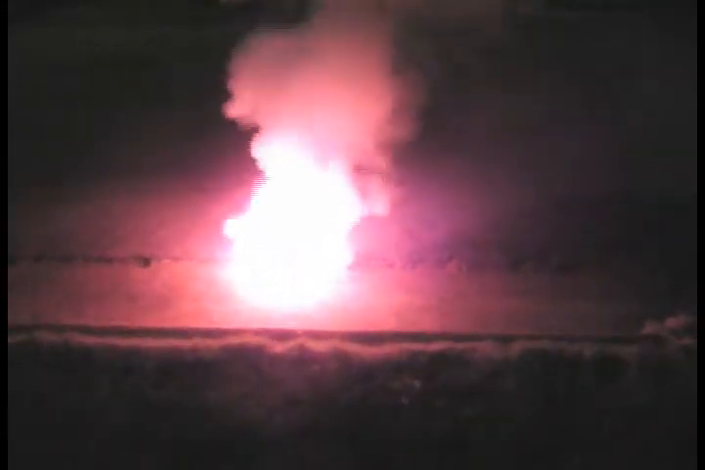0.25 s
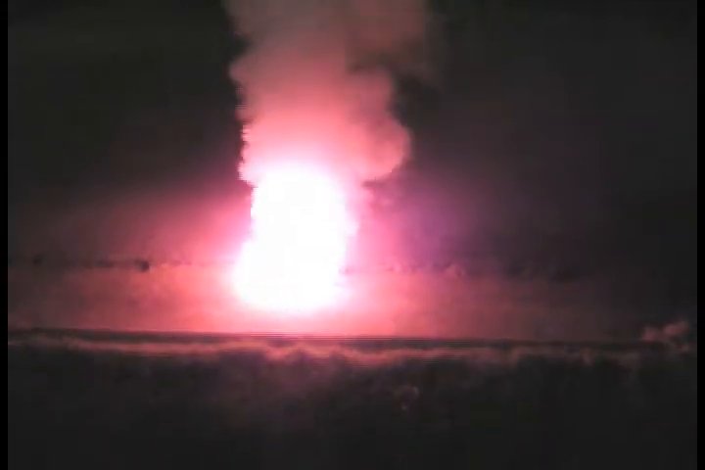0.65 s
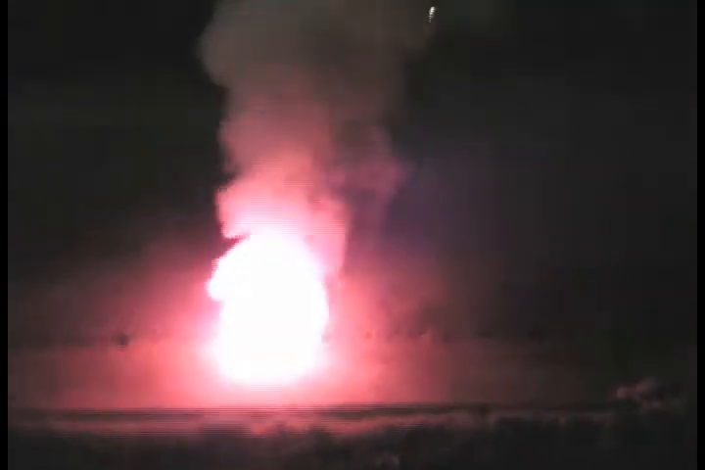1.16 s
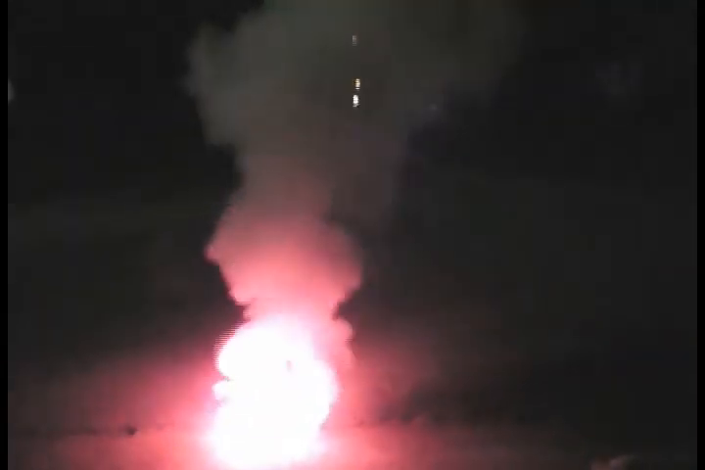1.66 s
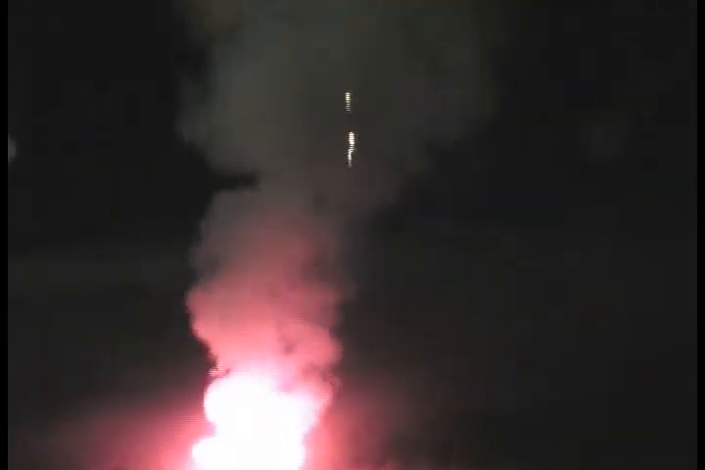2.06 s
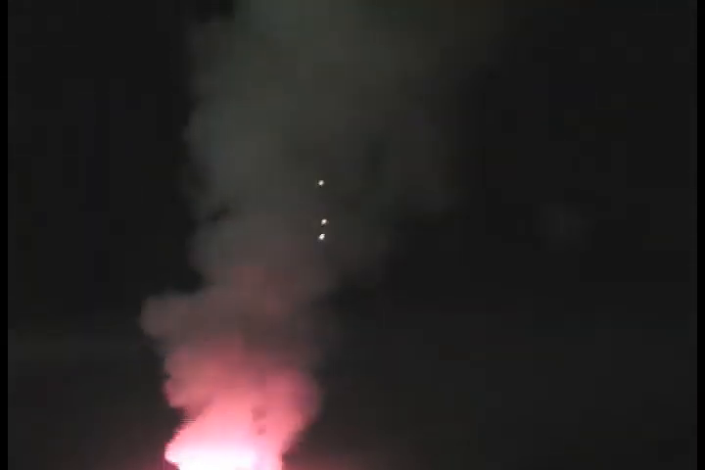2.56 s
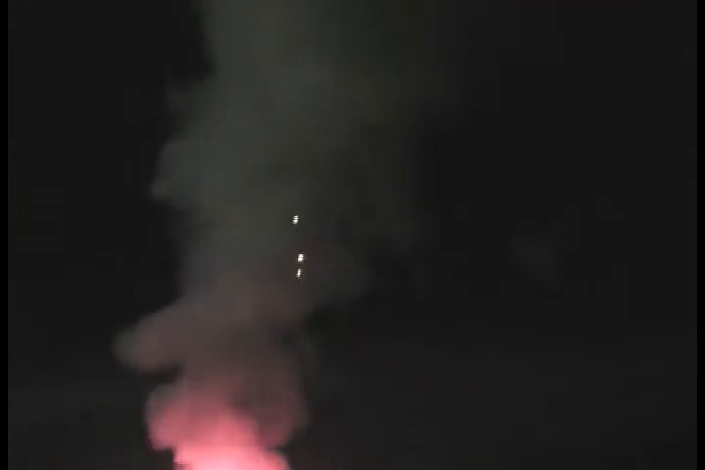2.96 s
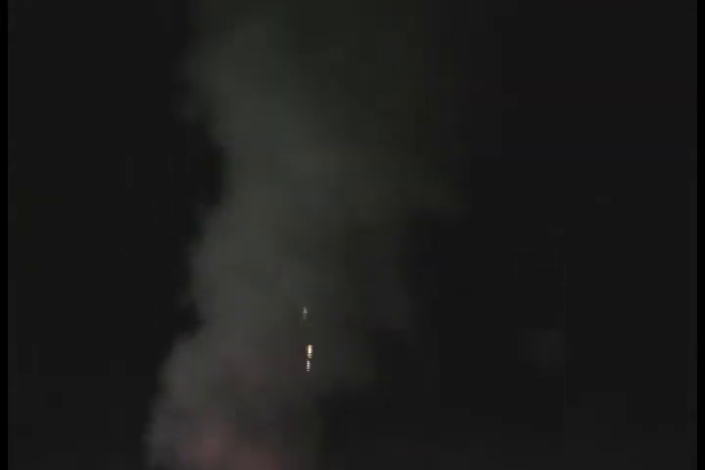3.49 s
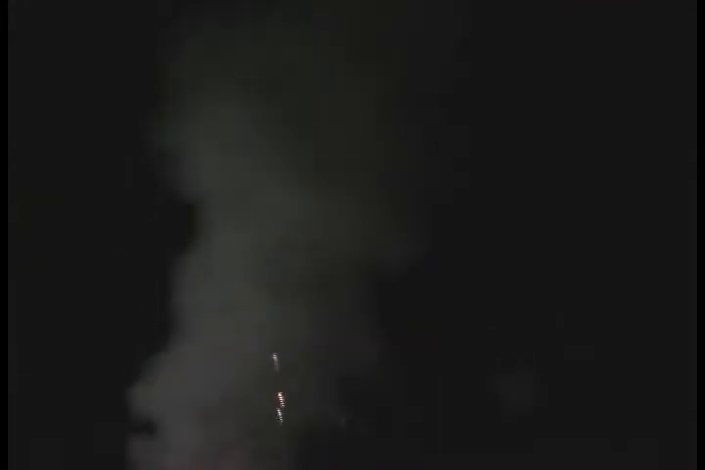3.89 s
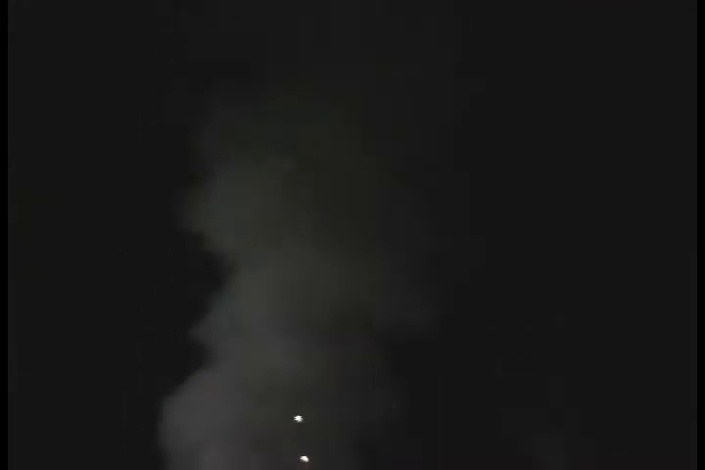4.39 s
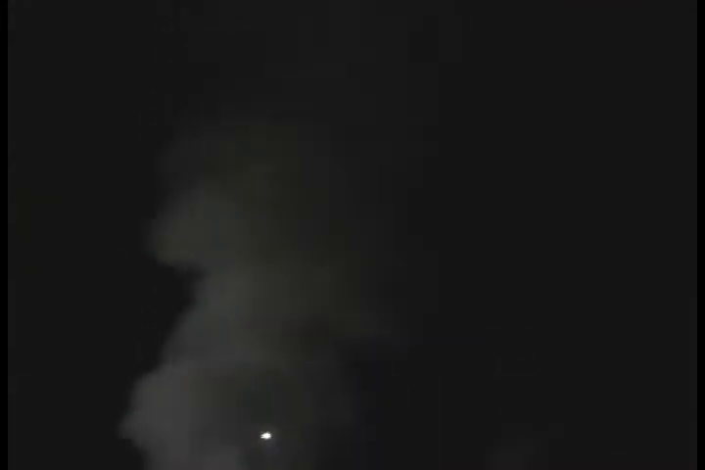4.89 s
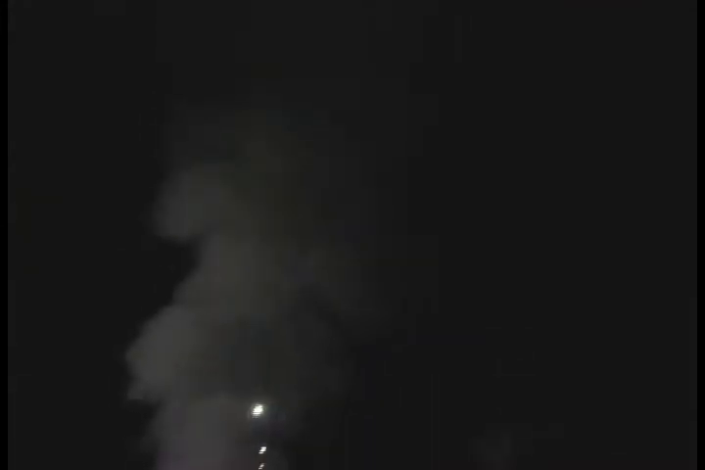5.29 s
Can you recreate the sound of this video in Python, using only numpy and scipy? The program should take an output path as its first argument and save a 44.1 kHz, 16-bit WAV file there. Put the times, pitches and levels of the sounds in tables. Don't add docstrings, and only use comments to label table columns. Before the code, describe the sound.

A burning smoke charge gives a dull, steady rushing hiss outdoors, broken by one loud sharp click, then slowly fading with a faint late hum.

```python
import sys
import numpy as np
from scipy import signal
from scipy.fft import rfft, irfft
from scipy.io import wavfile
from scipy.ndimage import uniform_filter1d

SR = 44100
rng = np.random.default_rng(int(sys.argv[2]) if len(sys.argv) > 2 else 0)


def output_pcm(signal):
    pcm = np.clip(np.atleast_2d(signal).T, -1, 1) * 32767
    wavfile.write(sys.argv[1], SR, np.round(pcm).astype(np.int16))


def linear_from_db(decibels):
    return 10 ** (np.asarray(decibels, float) / 20)


N = 244314

POP_S = .758074
MOTOR_HZ, MOTOR_START_S = 239.3, 4.58
SAG_HZ = 32

# middle in seconds, lowest pitch in Hz, length in seconds, level in dB.
CRACK_WHISTLES = [
    (2.764, 1380, 0.022, -34),
    (3.157, 1370, .024, -36),
]


def rms_one(x):
    return x / np.sqrt(np.mean(x ** 2) + 1e-20)


def track(rows, x):
    return np.interp(x, *np.transpose(rows))


def between(level, tilted, tilt):
    return level + (tilted - level) * tilt


def bell(x, centre, width):
    return np.exp(-.5 * ((x - centre) / width) ** 2)


def drift(count, t, rate):
    r = np.exp(-2 * np.pi * rate * (t[1] - t[0]))
    slow = signal.lfilter([1], [1, -2 * r, r * r], rng.standard_normal((count, len(t) + 200)))
    return rms_one(slow[:, 200:])


def wander(size):
    smooth = uniform_filter1d(rng.standard_normal(N), size=size)
    return rms_one(uniform_filter1d(smooth, size=size))


def ring(clicks, hz, t60):
    r, w = linear_from_db(-60 / (t60 * SR)), 2 * np.pi * hz / SR
    return signal.lfilter([0, np.sin(w)], [1, -2 * r * np.cos(w), r * r], clicks + 1e-18)


def jet():
    # frequency in Hz, density in dB.
    roar = [(20, -30.5), (45, -29.5), (76, -15.5), (109, -5), (232, -4), (311, -5.5), (505, -3), (1010, -7),
            (1200, -10.5), (1700, -13.5), (2400, -16), (3000, -22), (3500, -26.5), (4100, -29.5)]
    # centre in Hz, width in Hz, level in dB.
    hollows = [(220, 50, 2), (470, 120, 3), (830, 70, 2), (1160, 70, -3), (1460, 100, 3), (2370, 160, 2)]
    # time in seconds, level in dB.
    burn = [(0, -28), (.35, -27.5), (.7, -29), (1.0, -28), (1.3, -28), (1.55, -29.5), (1.8, -29.5),
            (2.3, -30), (2.8, -30.5), (3.3, -32.5), (3.7, -33), (4.1, -34.5), (4.5, -35), (5.0, -35.5),
            (5.54, -36.5)]
    # time in seconds, tilt from 0 to 1.
    turning = [(0, 0.06), (.9, 0.25), (1.5, 0.36), (2.1, 0.6), (2.6, .75), (3.1, .93), (4.4, 1.0),
               (5.54, 0.8)]
    # frequency level in Hz,
    # frequency tilted in Hz, width in Hz, depth level in dB, depth tilted in dB.
    dips = [(1650, 1665, 28, 8.5, 2), (1680, 1984, 38, -1.5, 6), (2030, 2180, 82, 0.5, 2),
            (2580, 4300, 376, 4, 7.5)]
    # centre in Hz, width in octaves, dB level, dB tilted.
    zones = [(266, 0.14, -1, -2.5), (520, 0.29, 1, -1), (55, 0.5, -1.5, 2), (110, 0.37, 0.3, 0.5),
             (1800, 0.65, 1.5, 2.5), (3830, 0.24, 3, -0.4)]
    # time in seconds, centre in Hz, length in seconds, change in dB.
    gusts = [(.03, 242, .06, -2.5), (.17, 2360, 0.093, 3.5), (.2, 95, .1, -3), (0.376, 139, .05, -8),
             (.55, 90, .06, 1), (.56, 797, 0.038, 2), (.66, 320, .07, 8.5), (.91, 620, 0.13, -3),
             (1.174, 560, .05, 5), (1.2, 95, .12, -6), (1.253, 2400, 0.11, 2.5), (1.05, 1450, .06, 0.5),
             (1.497, 520, 0.11, 3.5), (1.563, 227, 0.12, 4.5), (1.75, 480, 0.11, 3), (1.75, 100, .15, 3.5),
             (1.718, 1850, 0.11, -2.5), (1.98, 2300, 0.045, 2.5), (2.2, 950, .05, 2.5),
             (2.25, 1900, 0.12, -2), (2.345, 270, .05, -6), (2.55, 380, 0.046, 4), (2.55, 3000, .12, 2),
             (.05, 420, .08, 3.5), (1.35, 1050, .08, 0.5), (3.95, 3000, .15, 2), (2.75, 95, 0.27, -6.5),
             (2.75, 238, 0.038, 5), (2.966, 610, 0.045, 3.5), (2.98, 1800, .07, -2),
             (3.222, 560, 0.033, -3.5), (3.32, 95, .1, -5), (3.35, 2830, .05, 4), (3.55, 1450, 0.074, 2),
             (3.6, 410, 0.11, 2.5), (3.72, 230, 0.049, 3), (3.8, 90, .2, -4), (4.08, 1300, 0.092, -3),
             (4.6, 85, 0.18, 4.5), (4.6, 440, .04, 1), (5.25, 90, 0.17, 7.5), (5.33, 1800, .1, -2.5),
             (5.39, 180, .05, -4)]
    gust_octaves = .22
    clear_hz, clear_db = 32, -7
    shared_db, patchy_db = .7, .5

    hz, t, frames = signal.stft(rng.standard_normal(N), SR, nperseg=1024, noverlap=768)
    hz = np.maximum(hz, 1)[:, None]
    roar_hz, density_db = np.transpose(roar)
    shape = np.interp(np.log(hz), np.log(roar_hz), density_db, right=-120)
    for centre, width, db in hollows:
        shape = shape + db * bell(hz, centre, width)

    tilt = track(turning, t)
    tint = 0
    for centre_hz, width, level_db, tilted_db in zones:
        tint = tint + between(level_db, tilted_db, tilt) * bell(np.log2(hz / centre_hz), 0, width)
    for level_hz, tilted_hz, width_hz, level_db, tilted_db in dips:
        depth_db = between(level_db, tilted_db, tilt)
        tint = tint - depth_db * bell(hz, between(level_hz, tilted_hz, tilt), width_hz)

    octave = np.log2(hz[:, 0] / 1000)
    patch = np.clip(2 * octave + 11, 0, 15).astype(int)
    flicker = shared_db * drift(count=1, t=t, rate=45.0)
    flicker = flicker + patchy_db * drift(count=16, t=t, rate=6.4)[patch]
    for s, centre_hz, length, db in gusts:
        flicker += db * bell(np.log2(hz / centre_hz), 0, gust_octaves) * bell(t, s, length)

    flicker += clear_db * bell(hz, MOTOR_HZ, clear_hz) * (t > MOTOR_START_S)
    for s, low_hz, length, _ in CRACK_WHISTLES:
        flicker += .35 * clear_db * bell(hz, low_hz + SAG_HZ, 2 * SAG_HZ) * bell(t, s, 1.5 * length)

    even = np.sqrt(np.mean(linear_from_db(2 * shape)[7:26]) * 19 / len(hz))
    gain = linear_from_db(shape + tint + flicker + track(burn, t)) / even
    return signal.istft(frames * gain, SR, nperseg=1024, noverlap=768)[1][:N]


def puffs():
    # middle in seconds, pitch in Hz, pitch width in Hz, length in seconds, level in dB.
    leaks = [(0.809, 550, 10, .003, -22), (2.81, 1400, 45, .008, -39), (3.196, 1420, 20, .012, -39),
             (2.765, 1300, 40, .012, -40), (4.71, 112, 4, .04, -45), (4.72, 156, 4, .04, -45),
             (1.166, 549, 20, 0.006, -24), (1.217, 506, 30, 0.005, -27), (4.91, 445, 6, .05, -42),
             (5.2, 406, 4, .05, -42), (4.466, 200.6, 55, 0.03, -41), (5.098, 1002, 7.7, 0.078, -44.5)]
    t, out = np.arange(N) / SR, np.zeros(N)
    pitch_wander = wander(500)
    for s, hz, width_hz, length, db in leaks:
        phase = 2 * np.pi * np.cumsum(hz + width_hz * pitch_wander) / SR
        out += linear_from_db(db) * np.sqrt(2) * np.sin(phase) * bell(t, s, length)
    return out


def whistles():
    flutter_db = 3
    t, out = np.arange(N) / SR, np.zeros(N)
    for s, hz, length, db in CRACK_WHISTLES:
        pitch = hz + SAG_HZ * np.minimum(((t - s) / length) ** 2, 9)
        phase = 2 * np.pi * np.cumsum(pitch) / SR
        out += linear_from_db(db) * np.sqrt(2) * np.sin(phase) * bell(t, s, length)
    return out * linear_from_db(flutter_db * wander(300) - 0.5)


def pop():
    # frequency in Hz, level in dB, time to fall 60 dB in seconds.
    modes = [(490, -6.3, .0113), (750, -1.8, .0116), (1120, 5.9, .003), (2410, 19.7, .0033),
             (3090, 16, .004)]
    # delay in seconds, level in dB.
    echoes = [
        (0, -.97),
        (.0022, -13.2),
        (.00337, -16),
    ]
    width_s, rumble_cut_hz = .000146, 116
    t = np.arange(N) / SR
    blow = sum(linear_from_db(db) * bell(t, POP_S + delay, width_s) for delay, db in echoes)
    blow = np.gradient(blow) / (width_s * np.sqrt(2 * np.pi))
    rings = sum(linear_from_db(db) * ring(blow, hz, t60) / (2 * np.pi * hz) for hz, db, t60 in modes)
    return signal.lfilter(*signal.butter(2, rumble_cut_hz, "high", fs=SR), rings)


def motor():
    rise_s, level_db = .03, -46.3
    t = np.arange(N) / SR
    phase = 2 * np.pi * MOTOR_HZ * t
    level = linear_from_db(level_db) * np.sqrt(2) * np.clip((t - MOTOR_START_S) / rise_s, 0, 1)
    return level * (np.sin(phase) + linear_from_db(-18) * np.sin(phase / 2))


def scene():
    return (jet() + puffs() + whistles() + pop() + motor())[None]


def mirrored(x):
    # distance above half the low rate in Hz, level in dB.
    first_image = [(0, 0), (1350, -24.8), (2600, -47), (3100, -55), (3350, -62), (3600, -75), (4000, -95)]
    # distance above the low rate in Hz, level in dB.
    second_image = [(0, -125), (900, -90), (1300, -65), (2400, -59), (2600, -110), (4000, -120)]
    low_rate = 8000
    lines = rfft(np.concatenate([x, x[::-1]]))
    half = N * low_rate // SR
    above_hz = np.arange(half) * SR / N / 2
    lines[half:] = 0
    lines[half:2 * half] = np.conj(lines[half:0:-1]) * linear_from_db(track(first_image, above_hz))
    lines[2 * half:3 * half] = lines[:half] * linear_from_db(track(second_image, above_hz))
    return irfft(lines, 2 * N)[:N]


def starved_top(x):
    # frequency in Hz, share of patches that survive.
    survival = [(6750, .8), (7050, .45), (7300, .08), (7500, .02), (9000, .03), (9400, .16), (10400, .1)]
    from_hz, frame = 6750, 2048
    hz, t, frames = signal.stft(x, SR, "cosine", frame, boundary="even")
    patch = np.arange(len(hz)) // 5
    spare = 2 * rng.random(len(t)) ** 2 * 1.5 * linear_from_db(4 * drift(count=1, t=t, rate=1.5)[0])
    chance = rng.random((patch[-1] + 1, len(t)))[patch]
    kept = chance < track(survival, hz)[:, None] * spare
    return signal.istft(frames * (kept | (hz < from_hz)[:, None]), SR, "cosine", frame)[1][:N]


def low_pass(x):
    return signal.sosfilt(signal.butter(12, 13100, fs=SR, output="sos"), x)


def record(dry):
    duck_db, recover_s = -5, .22
    ceiling, trough, offset = .95, -.954, -.0386
    t = np.arange(N) / SR
    since = t - POP_S - .003
    duck = np.clip(since / .003, 0, 1) * np.exp(-np.maximum(since, 0) / recover_s)
    clipped = np.minimum(dry[0] * linear_from_db(duck_db * duck), ceiling)
    fine = np.maximum(starved_top(mirrored(clipped)), trough)
    nulled = signal.filtfilt(*signal.iirnotch(3950, 20, fs=SR), fine)
    nulled = nulled + 1.2 * signal.filtfilt(*signal.iirpeak(3600, 7, fs=SR), fine)
    fine = fine + (nulled - fine) * np.minimum(1, 1.5 * bell(since, -.002, .005))
    closing = 1 - .7 * bell(t, N / SR, .0006)
    top_cut = signal.cheby2(8, 35, 13600, fs=SR, output="sos")
    mix = (signal.sosfiltfilt(top_cut, fine) + offset)[None] * closing
    return low_pass(mix)


dry = scene()
out = record(dry)
output_pcm(out)
```